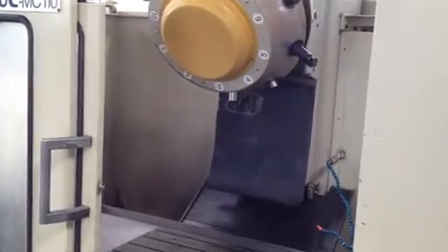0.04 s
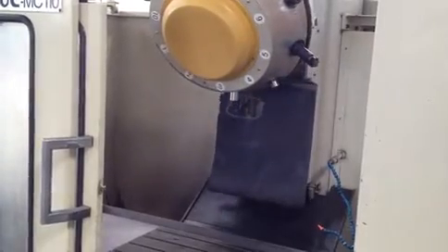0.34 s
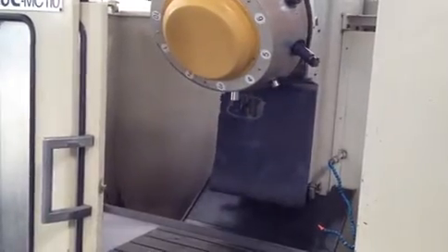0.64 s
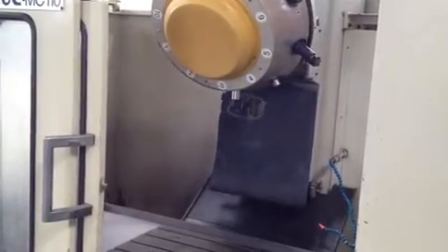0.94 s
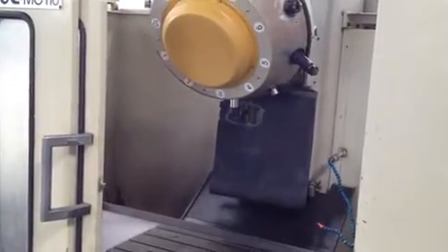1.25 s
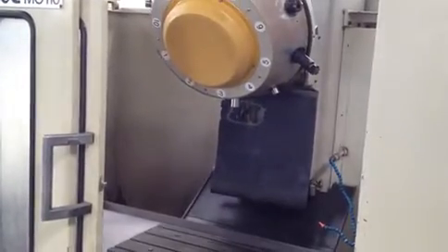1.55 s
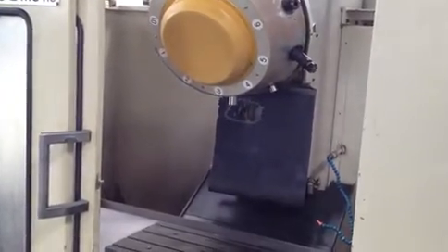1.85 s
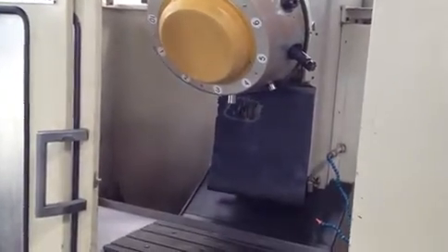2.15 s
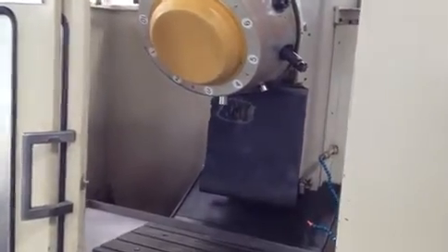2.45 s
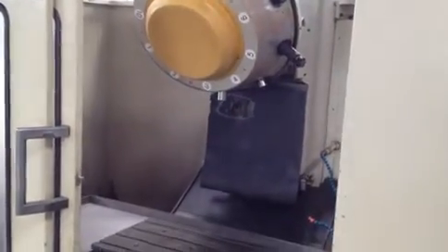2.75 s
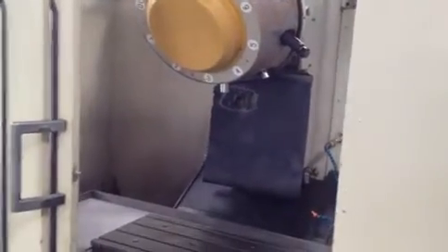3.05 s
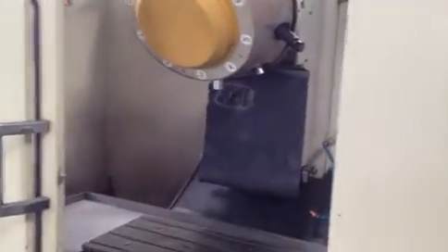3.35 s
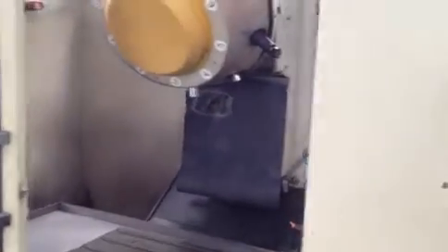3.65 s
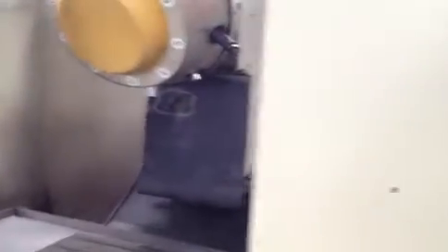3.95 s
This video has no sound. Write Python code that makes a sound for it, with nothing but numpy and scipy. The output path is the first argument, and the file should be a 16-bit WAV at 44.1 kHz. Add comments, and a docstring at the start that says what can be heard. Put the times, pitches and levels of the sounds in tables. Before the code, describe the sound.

A machining centre hums and hisses steadily in a workshop. Its tool turret slides with a scrape and a puff of air, a latch snaps during a brief high whine, then a heavy clunk shakes the enclosure.

```python
"""Machining centre turret move

A pump motor hums, fans rush and the drives sing thinly. The tool turret slides home with a scrape
and a puff of air, a steel latch snaps while the servo whines, then the clamp shuts with a heavy
clunk that shakes the sheet-metal enclosure."""
import sys
import numpy as np
from scipy.fft import rfft, irfft, next_fast_len
from scipy.io import wavfile
from scipy.ndimage import map_coordinates

SR = 44100
rng = np.random.default_rng(int(sys.argv[2]) if len(sys.argv) > 2 else 0)


def transcribe(signal):
    """Save signal, clipped to [-1, 1], as a 16-bit WAV file at the path in sys.argv[1]."""
    frames = np.atleast_2d(signal).T
    limited = np.clip(frames, -1, 1)
    pcm = np.round(limited * 32767).astype(np.int16)
    wavfile.write(sys.argv[1], SR, pcm)


N = 4 * SR


def amp(db):
    return 10 ** (np.asarray(db) / 20)


def unit_rms(x):
    return x / np.sqrt(np.mean(x ** 2) + 1e-20)


def clock():
    return np.arange(N) / SR


def level(rows):
    """Gain per sample from (time [s], level [dB])."""
    return amp(np.interp(clock(), *np.transpose(rows)))


def wobble(rate_hz):
    """Smooth random curve."""
    return map_coordinates(rng.standard_normal(400), [clock() * rate_hz], mode="wrap")


def filtered(x, response):
    size = next_fast_len(N + SR // 4)
    return irfft(rfft(x, size) * response(np.fft.rfftfreq(size, 1 / SR)), size)[:N]


def noise(spectrum):
    """Unit-rms noise from (frequency [Hz], relative density [dB])."""
    knots_hz, db = np.transpose(spectrum)
    white = rng.standard_normal(N)
    return unit_rms(filtered(white, lambda hz: amp(np.interp(np.log(hz + 1), np.log(knots_hz), db))))


def band(hz, width_hz):
    """Unit-rms noise in one resonance."""
    def resonance(f):
        return (1 + ((f - hz) / width_hz) ** 2 / 2) ** -2 * (f / (f + hz)) ** 2
    return unit_rms(filtered(rng.standard_normal(N), resonance))


def tone(hz, drift_hz):
    """Unit-rms sine with wandering pitch."""
    turns = np.cumsum(hz + drift_hz * wobble(8.85)) / SR + rng.random()
    return np.sqrt(2) * np.sin(2 * np.pi * turns)


def swell(peak_s, rise_s, t60_s, hold_s=0):
    """Gaussian rise, hold, exponential decay."""
    t = clock() - peak_s
    return np.exp(-(np.minimum(t, 0) / rise_s) ** 2) * amp(-60 * np.maximum(t - hold_s, 0) / t60_s)


def ringing(rows):
    """Clean resonances that build up and die away."""
    return sum(amp(db) * swell(*shape) * tone(hz, drift_hz=4) for hz, db, *shape in rows)


CRACK_T60_S, PANEL_LOW_HZ = 0.012, 110


def impacts(contacts, modes, spectrum, crack_db, crash_t60_s, tail_db, tail_t60_s, attack_s, ring_rise_s):
    """Each contact cracks, crashes and rings the modes; soft ones are duller, panels radiate no lows."""
    out, t = np.zeros(N + SR), np.arange(SR) / SR
    for start_s, crash_db, ring_db, cutoff_hz in contacts:
        ring = sum(amp(db + rng.normal(0, 1) - 60 * t / t60_s)
                   * np.sin(2 * np.pi * (hz * t + rng.random())) for hz, db, t60_s in modes)
        ring *= amp(ring_db) * (1 - np.exp(-t / ring_rise_s))
        crash = filtered(noise(spectrum), lambda hz: (1 + (hz / cutoff_hz) ** 6) ** -.5
                         * hz ** 2 / (hz ** 2 + PANEL_LOW_HZ ** 2))[:SR]
        crack = amp(crack_db - 60 * t / CRACK_T60_S)
        enclosure_tail = amp(tail_db - 60 * t / tail_t60_s)
        crash *= crack + amp(-60 * t / crash_t60_s) + enclosure_tail
        crash *= amp(crash_db) * (1 - np.exp(-t / attack_s))
        out[round(start_s * SR):][:SR] += ring + crash
    return out[:N]


# (time [s], level [dB])
HUM_LEVEL = [(0, -46.5), (.4, -42.5), (.9, -44), (1.5, -41.5), (2.1, -42), (2.6, -40.5), (3.4, -40.5),
             (4, -42)]


def pump():
    """Pump motor hum."""
    return level(HUM_LEVEL) * tone(hz=229.55, drift_hz=0.25)


# (frequency [Hz], level [dB])
STEADY_TONES = [(592, -66.5), (1034, -68.5), (1093, -69), (1270, -65), (1324, -61), (1498, -64.5),
                (1549.5, -60), (1631, -65), (1734, -61.5), (1954, -69), (1987, -58.5), (2293, -63.5),
                (2525, -67.5), (2811, -68.5), (5945, -73.5), (6058, -70.5)]
# Swelling tones: (time [s], level [dB])
FAN_TONE_LEVEL = [(0, -55), (1.2, -58.5), (1.9, -61.5), (2.501, -56.5), (3.35, -54), (3.7, -68), (4, -51)]
LOW_TONE_LEVEL = [(0, -55), (.3, -54), (1.5, -53), (2.5, -59), (3, -59), (4, -59)]
MID_TONE_LEVEL = [(0, -59), (2.95, -66), (3.28, -52.5), (3.48, -53), (3.65, -59), (3.77, -52), (4, -53)]
DRIVE_LEVEL = [(0, -61.5), (1.3, -59.5), (1.55, -58.5), (2.1, -59), (2.5, -72), (2.75, -58.5), (3, -77),
               (3.27, -56.5), (3.43, -65.5), (3.65, -57), (4, -76)]
HIGH_TONE_LEVEL = [(0, -71), (1.3, -70.5), (2.2, -73.5), (2.55, -65.5), (3.25, -77), (3.5, -67),
                   (3.68, -75), (3.8, -69), (4, -75)]


def motor_tones():
    """Thin tones of motors, fans and drives: most waver, five swell and fade."""
    steady = sum(amp(db + 2.4 * wobble(3.61)) * tone(hz, drift_hz=1.1) for hz, db in STEADY_TONES)
    levels_by_hz = {886.5: FAN_TONE_LEVEL, 1448.8: LOW_TONE_LEVEL, 1810.5: MID_TONE_LEVEL,
                    6001: DRIVE_LEVEL, 8436: HIGH_TONE_LEVEL}
    return steady + sum(level(rows) * tone(hz, drift_hz=0.64) for hz, rows in levels_by_hz.items())


# (frequency [Hz], relative density [dB])
RUSH_SPECTRUM = [(25, -44), (50, -31.5), (85, -23), (130, -6), (200, 1.5), (330, 0.5), (390, -3), (455, 4),
                 (520, -2.5), (610, 0.5), (780, -2.5), (1130, -3.5), (1400, -2), (2100, 1.5), (2500, -4.5),
                 (3050, -9.5), (4100, -3.5), (5400, -11), (6600, -16), (7600, -16.5), (8700, -22.5),
                 (9600, -32.5), (10200, -52)]
# (time [s], level [dB])
RUSH_LEVEL = [(0, -44), (.3, -43), (.9, -42.5), (1.5, -44), (2, -45), (2.9, -44), (3.35, -44.5), (4, -44.5)]
SINGING_LEVEL = [(0, -51), (1.2, -56.5), (1.5, -52), (1.7, -67), (3.1, -76), (3.3, -48.5), (3.48, -56),
                 (3.6, -57), (3.8, -70), (4, -59)]


def fans():
    """Even rush of cooling air; a hoarse singing comes and goes."""
    rush = level(RUSH_LEVEL) * amp(0.71 * wobble(11)) * noise(RUSH_SPECTRUM)
    return rush + level(SINGING_LEVEL) * band(hz=1983, width_hz=20)


# (peak [s], level [dB], rise [s], hold [s], t60 [s])
AIR_PUFFS = [(0.08, -42, 0.1, 0.13, 1), (0.595, -43.5, 0.024, 0.024, 1), (1.1, -43.5, 0.028, 0.15, 1)]
# (frequency [Hz], relative density [dB])
AIR_SPECTRUM = [(300, -22), (900, 11), (2000, 8.5), (3200, -5), (5000, 3.5), (6500, 0.5), (8100, 2),
                (9200, -11), (10200, -26.5)]
# (frequency [Hz], width [Hz], level [dB], peak [s], rise [s], t60 [s])
AIR_WHISTLE = (8232, 52, -61, 1.6, 0.2, 0.1)


def air():
    """Air escapes at each turret move and whistles faintly as it runs out."""
    hz, width_hz, whistle_db, *shape = AIR_WHISTLE
    whistle = amp(whistle_db) * swell(*shape) * band(hz, width_hz)
    return whistle + sum(amp(db) * swell(peak_s, rise_s, t60_s, hold_s) * noise(AIR_SPECTRUM)
                         for peak_s, db, rise_s, hold_s, t60_s in AIR_PUFFS)


# (frequency [Hz], width [Hz], level [dB], peak [s], rise [s], t60 [s])
SCRAPE_BANDS = [(1323, 47, -39.5, 0.12, 0.042, 0.85), (1700, 55, -47, 0.16, 0.12, 2.4),
                (767, 120, -44.5, 0.11, 0.04, 2.2), (253, 110, -43, 0.11, 0.047, 0.93)]
# (frequency [Hz], level [dB], peak [s], rise [s], t60 [s])
SCRAPE_SQUEAKS = [(1335, -40, 0.154, 0.022, 0.28), (1477, -41, 0.135, 0.016, 0.16),
                  (898, -41.5, 0.208, 0.033, 0.13)]


def scrape():
    """Sliding steel squeaks and excites noisy resonances."""
    squeaks = ringing(SCRAPE_SQUEAKS)
    return squeaks + sum(amp(db) * swell(*shape) * band(hz, width_hz)
                         for hz, width_hz, db, *shape in SCRAPE_BANDS)


WHINE_HZ, MAINS_HZ = 6009, 50
# (time [s], level [dB])
WHINE_LEVEL = [(.47, -100), (.5, -51.5), (.56, -50.5), (.61, -44.5), (.72, -44), (.79, -45.5), (.84, -50.5),
               (.9, -51.5), (.97, -57), (1.04, -60), (1.12, -100)]
SIDE_TONE_LEVEL = [(.47, -100), (.51, -66), (.6, -55.5), (.805, -55), (.83, -58), (.9, -100)]
# (time [s], frequency [Hz])
SIDE_TONE_PITCH = [(.49, 6060), (.59, 6400), (.8, 6430), (.86, 6100)]


def servo():
    """Raspy whine, pulsing at mains rate under load; a side tone follows speed-up and braking."""
    beat = np.cos(2 * np.pi * MAINS_HZ * (clock() - .711) + .25 * wobble(12))
    carrier = tone(WHINE_HZ, drift_hz=2.3) + amp(-9) * band(WHINE_HZ, width_hz=66)
    whine = unit_rms((0.55 + 2 * beat) * carrier)
    side_hz = np.interp(clock(), *np.transpose(SIDE_TONE_PITCH))
    side_tone = tone(side_hz, drift_hz=25) * amp(2.5 * wobble(70))
    return level(WHINE_LEVEL) * amp(1.2 * wobble(30)) * whine + level(SIDE_TONE_LEVEL) * side_tone


# (time [s], crash [dB], ring [dB], cutoff [Hz])
LATCH_CONTACTS = [(.5738, -32, -32, 12000), (.583, -33, -44, 11000), (.599, -43, -47, 6000)]
# (frequency [Hz], relative level [dB], t60 [s])
LATCH_MODES = [(1252, -12.5, 0.4), (1620, -19, 0.29), (1903, -1.5, 0.23), (2430, 3, 0.066),
               (2790, -1.5, 0.03), (6120, 6, 0.041)]
# (frequency [Hz], relative density [dB])
LATCH_SPECTRUM = [(35, -49), (100, -32), (270, 3), (450, -1), (720, 5), (1100, -4.5), (2400, 4),
                  (3500, -10.5), (5000, -12), (6200, -5.5), (8400, -1), (9400, -18.5), (10300, -18)]
# (frequency [Hz], level [dB], peak [s], rise [s], t60 [s])
LATCH_PANEL_RING = [(628, -39, 0.68, 0.013, 0.17), (771, -42.5, 0.616, 0.025, 0.3),
                    (285, -46, .595, 0.018, 0.62)]


def latch():
    """Bright steel snap, answered by the panels."""
    snap = impacts(LATCH_CONTACTS, LATCH_MODES, LATCH_SPECTRUM, crack_db=-6, crash_t60_s=0.12,
                   tail_db=-15, tail_t60_s=0.39, attack_s=0.00047, ring_rise_s=0.0015)
    return snap + ringing(LATCH_PANEL_RING)


# (time [s], crash [dB], ring [dB], cutoff [Hz])
CLAMP_CONTACTS = [(1.053, -40, -32, 2400), (1.0783, -29, -23, 11900), (1.0875, -29.5, -22.5, 8500),
                  (1.111, -31, -35, 4020), (1.12, -37, -39, 10000), (1.156, -40, -33, 1300)]
# (frequency [Hz], relative level [dB], t60 [s])
CLAMP_MODES = [(620, -17, 0.11), (743, -18, 0.17), (840, -16, .08), (1032, -12, 0.18), (1282, 3.5, 0.066),
               (1370, -20, 0.033), (1882, -7, 0.07), (1900, -9, 0.1)]
# (frequency [Hz], relative density [dB])
CLAMP_SPECTRUM = [(70, -28), (160, 4), (400, -2), (900, 9), (1400, -1), (2200, 4), (3200, -9), (4800, -3.5),
                  (6500, -4), (8300, -12), (9400, -18.5), (10200, -46)]
SHUDDER_SPECTRUM = [(30, -39), (70, -27.5), (110, -9.5), (165, 4.5), (260, 2), (500, -5.5), (780, -0.5),
                    (1100, -16.5), (2000, -10), (3000, -27), (6000, -48.5)]
# (frequency [Hz], level [dB], peak [s], rise [s], t60 [s])
CLAMP_PANEL_RING = [(249, -34.5, 1.116, 0.0082, 0.087), (743, -48, 1.3, 0.028, 0.14)]


def clamp():
    """Heavy clunk of several contacts; the panels ring and shudder on."""
    clunk = impacts(CLAMP_CONTACTS, CLAMP_MODES, CLAMP_SPECTRUM, crack_db=-8.5, crash_t60_s=0.098,
                    tail_db=-17.5, tail_t60_s=0.68, attack_s=0.0012, ring_rise_s=0.0043)
    shudder_gain = amp(-42 + 1.2 * wobble(55)) * swell(1.138, rise_s=0.087, t60_s=2.07, hold_s=0.18)
    return clunk + ringing(CLAMP_PANEL_RING) + shudder_gain * noise(SHUDDER_SPECTRUM)


def scene():
    """All sources, alike in both channels."""
    idle = pump() + motor_tones() + fans()
    turret = air() + scrape() + latch() + clamp() + servo()
    return np.tile(idle + turret, (2, 1))


BAND_LIMIT_HZ = 10200


def record(dry):
    """Brick-wall low-pass."""
    return np.array([filtered(x, lambda hz: hz < BAND_LIMIT_HZ) for x in dry])


dry = scene()
out = record(dry)
transcribe(out)
```